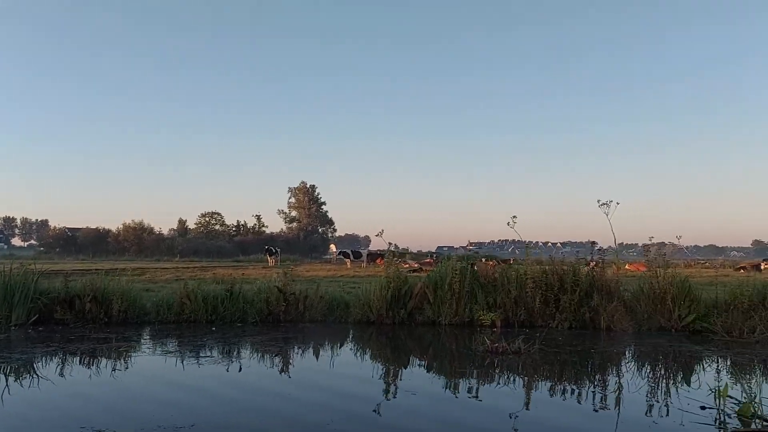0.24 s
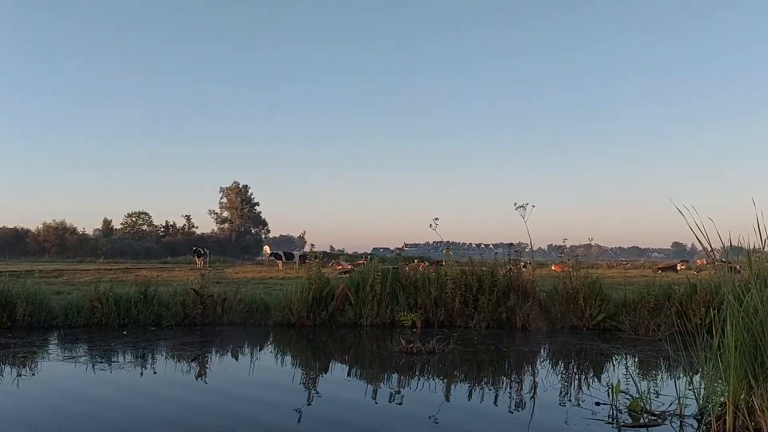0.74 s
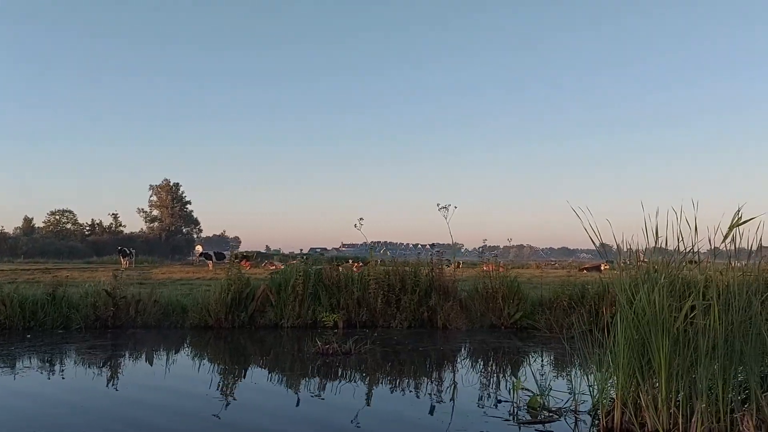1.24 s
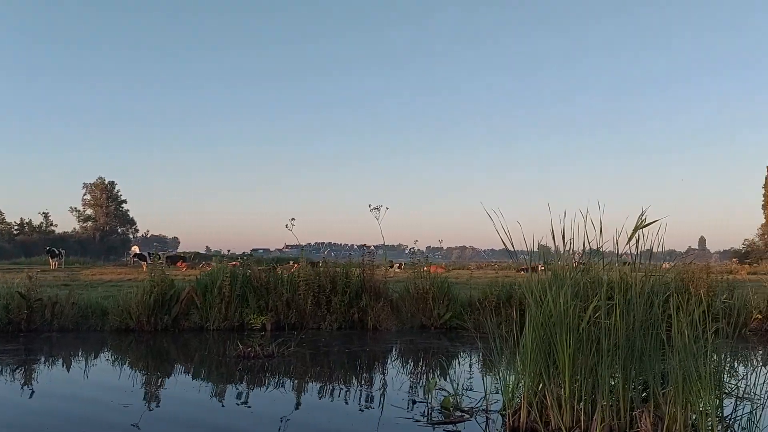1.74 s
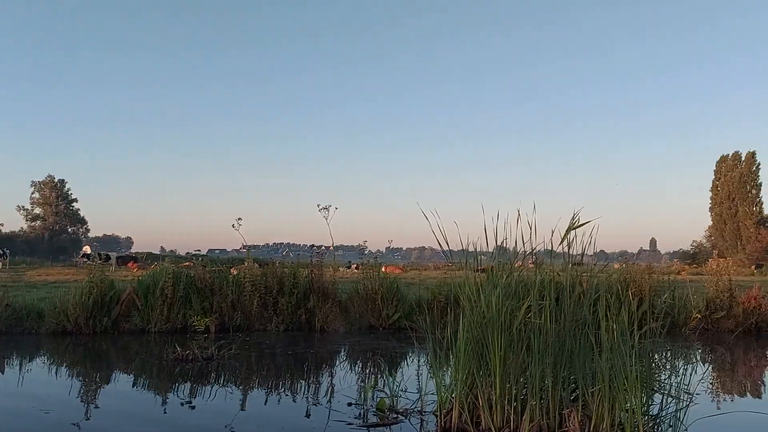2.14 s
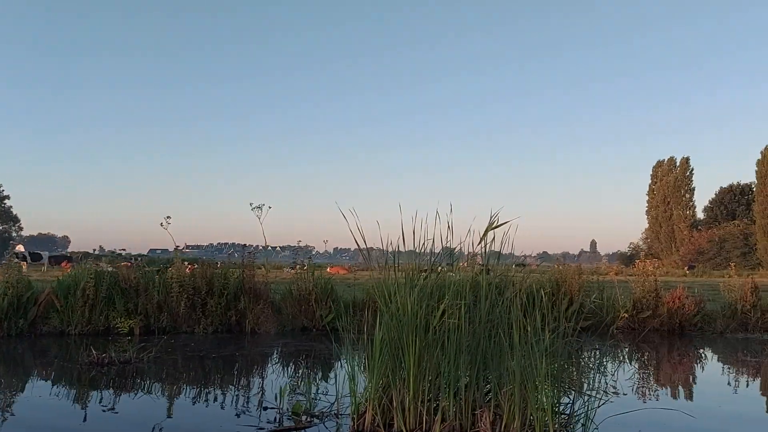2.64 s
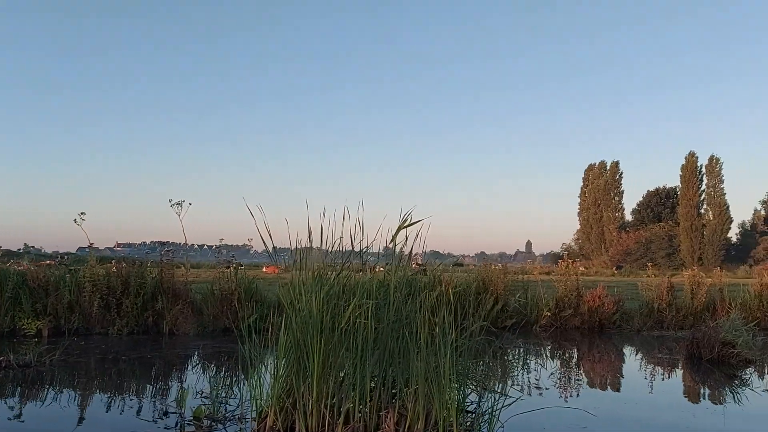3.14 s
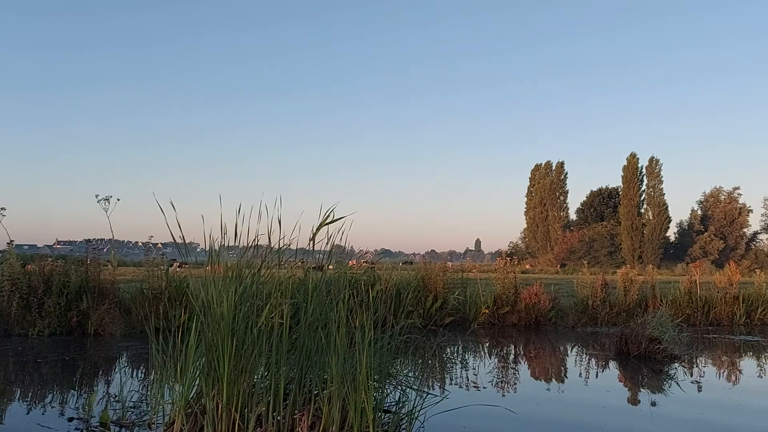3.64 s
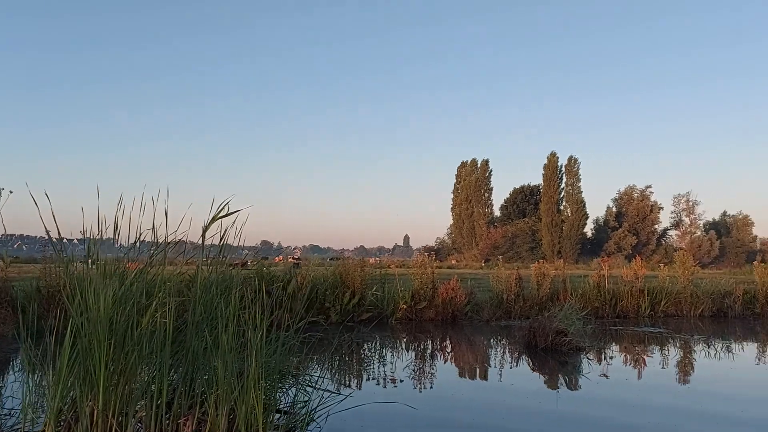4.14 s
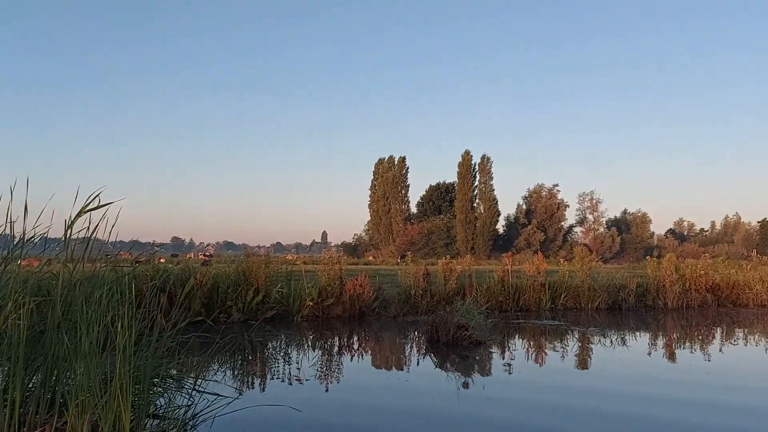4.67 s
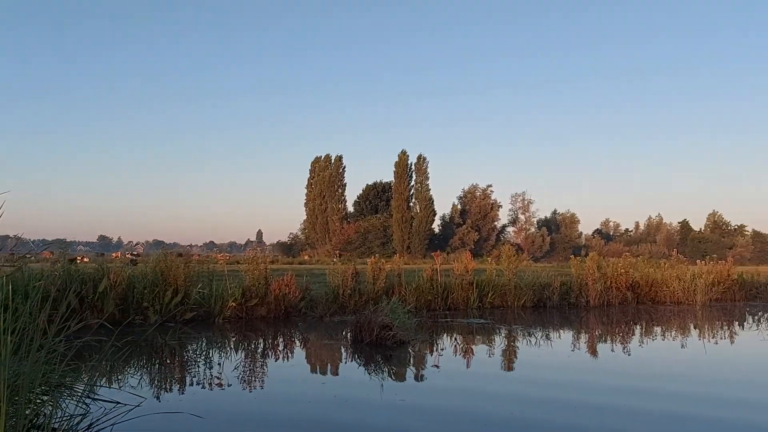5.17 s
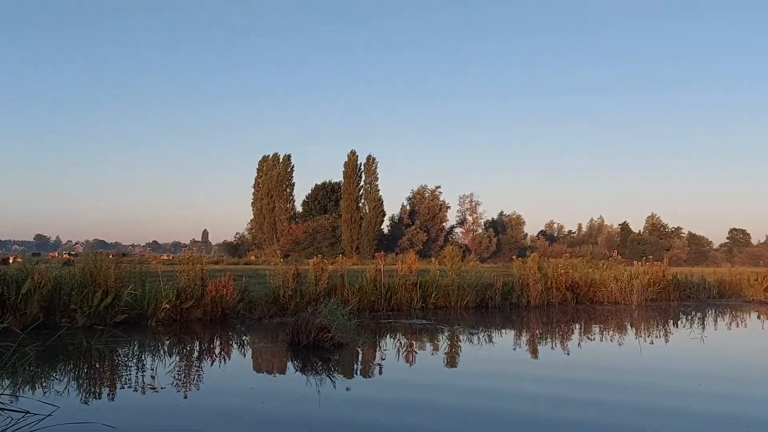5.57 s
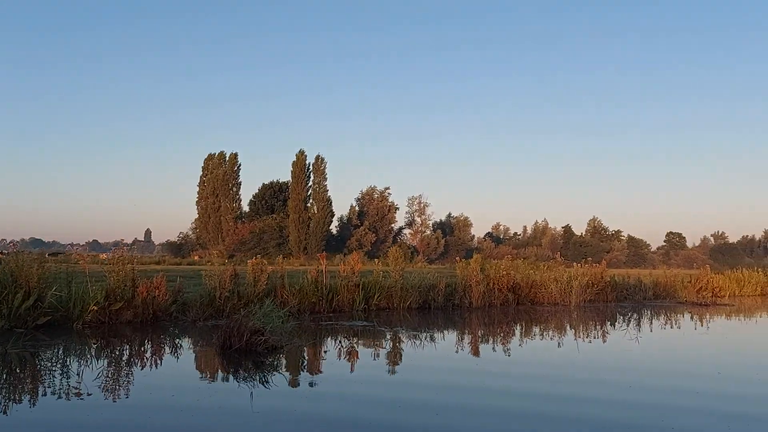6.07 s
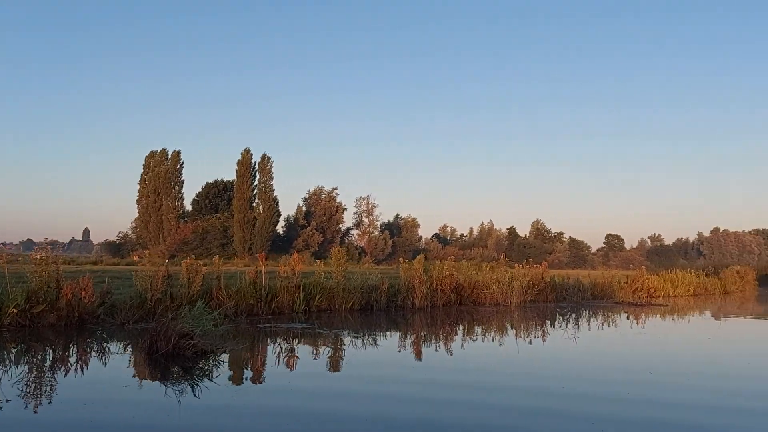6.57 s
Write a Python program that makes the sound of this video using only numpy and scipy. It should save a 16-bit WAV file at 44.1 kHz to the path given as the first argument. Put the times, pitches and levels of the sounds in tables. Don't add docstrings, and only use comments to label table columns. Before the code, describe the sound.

A small boat engine idles close by on a still pond throughout: low buzzing hum, irregular metallic ticks, thin hiss and little water drips. Halfway through, a cow on the grassy bank gives one rising, strained moo of about a second. A water bird rasps faintly as it ends. The motor dips slightly, then a deeper cow starts a call, cut off at the end. Open outdoor stereo, the right side duller.

```python
import sys
import numpy as np
from scipy import signal
from scipy.fft import rfft, irfft, next_fast_len
from scipy.io import wavfile
from scipy.ndimage import uniform_filter1d

SR = 44100
rng = np.random.default_rng(int(sys.argv[2]) if len(sys.argv) > 2 else 0)


def rack_gain(trim_db):
    fader = np.asarray(trim_db, float)
    return 10 ** (fader / 20)


def unload_audio(sound):
    columns = np.transpose(np.atleast_2d(sound))
    steps = np.round(np.clip(columns, -1, 1) * 32767)
    wavfile.write(sys.argv[1], SR, steps.astype(np.int16))


N = 300321
TIME = np.arange(N) / SR
HZ = np.fft.rfftfreq(next_fast_len(N), 1 / SR) + 1e-3

FIRING_HZ = 30.05
# time in seconds, lead on a steady idle in firings.
HUNTING_S_FIRINGS = [(0, .035), (.3, .09), (.45, .167), (.95, .135), (1.1, .09), (1.4, -.095), (1.55, -.09),
                     (2.4, .095), (2.55, .05), (3.15, .025), (3.5, -.165), (3.95, -.29), (4.25, -.27),
                     (4.95, .3), (5.25, .29), (5.55, .395), (6.3, .365), (6.81, .09)]
# time in seconds, level in dB.
SWING_S_DB = [(0, 0.5), (.9, .5), (1.6, 0.5), (2.3, -.5), (3.3, 0), (4.4, 1), (4.6, -2.5), (5.2, -5.5),
              (5.8, -3.5), (6.05, -0.5), (6.81, 1.5)]
STRONG_ORDERS = [(3, 0.01), (4, -0.02), (5, -0.31)]
# multiple of the firing rate, start in cycles, rms in dB.
WEAK_ORDERS = [(2, -0.16, -50.5), (4.5, -0.49, -52), (6, -0.038, -47), (8, -0.19, -48), (11, 0.06, -49.5),
               (14, -0.39, -58.5)]
ORDER_DB, ORDER_SWING, ORDER_SAG = [-36, -30.5, -38], [0.25, 1.73, 0.38], [0.13, 2.7, 0.33]
FIFTH_FADE_DB_PER_S, SEVENTH_DB = -1.12, -44.5
# time in seconds, depth in dB.
SAGS_S_DB = [
    (0, -9),
    (.45, -1),
    (1.33, -1.5),
    (2.4, -4.5),
    (2.85, -1.5),
    (3.75, -3.5),
    (4.35, -2.5),
    (5.1, -4),
]
# time in seconds, height in dB.
BURBLE_S_DB = [
    (0.1, 3),
    (1.05, 2.5),
    (1.75, 0),
    (3.0, 2.5),
    (4.1, -3),
]
SAG_S, BURBLE_S = 0.076, 0.15
# time in seconds, rms in dB, half length in seconds.
SEVENTH_SWELLS = [(0.343, -36, 0.042), (0.546, -35, 0.043), (2.075, -37, 0.017), (1.003, -33.5, 0.17),
                  (1.91, -39.5, 0.23), (2.486, -36.5, 0.025), (2.754, -36.5, 0.064), (3.9, -48, 0.35),
                  (5.235, -42, 0.13), (6.108, -38, 0.097), (6.6, -44.5, 0.66)]
# frequency in Hz, density in dB per Hz.
RUMBLE_HZ_DB = [(20, -45), (40, -15.5), (70, -11.5), (110, -0.5), (200, -7), (330, -8.5), (430, -11),
                (520, -20), (800, -25), (1200, -47)]
CLATTER_HZ_DB = [(500, -5), (800, 2.5), (1000, 2.5), (1200, 0.5), (1400, 2.5), (1750, -1), (2000, -4.5),
                 (2400, -2.5), (3000, -13), (3500, -8), (4200, -13.5), (6000, -21.5)]
HISS_HZ_DB = [(3000, -22), (4200, -12), (5200, -4), (6300, 2), (6900, -3), (7900, 7.5), (8600, 1.5),
              (9100, 5), (9700, -6), (11000, 3), (12000, 6.5), (13000, 3), (13500, 2), (14000, -13),
              (15800, -2.5)]
# share of the turn, gain in dB.
BREATHING_DB = [(0, 5.5), (.1, -1), (.27, -1.5), (.45, 1), (.68, 4), (.85, 2), (1, 5.5)]
# share of the turn, gain in dB.
COVER_SWELL_DB = [(0, -19), (.1, 10), (.2, 1.5), (.3, 6), (.45, 4.5), (.6, 3.5), (.72, -1.5), (.9, -6),
                  (1, -11)]
COVER_HZ, COVER_WIDTH_HZ = 691.5, 19
LAYER_DB, LAYER_SWING = [-36, -51, -62.5, -51], [0.63, 1, 0.14, 0.36]
CLATTER_RISE_DB_PER_S = 0.2064
# time in seconds, crack peak in dB, knock above that in dB.
TICKS = [(0.122, -37, -23), (0.3317, -49, 8.5), (0.3865, -44, -26), (0.493, -44, 2), (0.5243, -24, -7),
         (0.6256, -31, -6.5), (0.7256, -34.5, -4.5), (0.9183, -37, -15), (1.129, -36.5, -6),
         (1.266, -28, -10.5), (1.49, -34, -10), (1.597, -45.5, 8), (1.698, -44, -2), (1.7294, -35, 3.5),
         (1.861, -33, -3.5), (1.931, -24.5, -13), (2.0643, -45, 8.5), (2.195, -39, -4.5), (2.2952, -47, 4),
         (2.4604, -44, 2), (2.613, -33, -16), (2.727, -36.5, -3), (3.039, -41, -11), (3.1262, -44, 5),
         (3.263, -34, -7), (3.8046, -30, -6), (4.0705, -47, -5), (4.2042, -44, -2), (4.3334, -35, -8),
         (4.461, -32, -9.5), (5.249, -36.5, -6.5), (5.444, -43, -1), (5.6764, -35, -3),
         (5.7114, -26.5, -15), (5.1706, -41, -13), (6.2233, -42, -14), (6.313, -33, -9), (6.449, -36, -10)]
# time in seconds, peak in dB.
TICK_TOPS_S_DB = [(0.12, -44.5), (0.188, -47), (0.3865, -43.5), (0.4449, -47), (0.5246, -34.5),
                  (0.626, -43), (0.684, -47), (0.9173, -50), (1.2032, -49), (1.265, -44), (1.4531, -44),
                  (1.4875, -46), (1.512, -42.5), (1.5978, -48), (1.729, -42), (1.7928, -50), (1.8173, -49),
                  (1.861, -43), (1.9303, -42.5), (1.9879, -52), (2.3144, -46), (2.4615, -47),
                  (2.7277, -46.5), (2.7995, -46.5), (3.0465, -50), (3.0789, -49), (3.2131, -48),
                  (3.262, -46), (3.631, -45), (4.2604, -49), (4.3326, -47), (4.4622, -50), (4.8489, -49),
                  (5.0677, -47.5), (5.1677, -50), (5.247, -45), (5.444, -46), (5.6745, -45), (5.7113, -39),
                  (5.9, -49), (5.9663, -51), (6.0417, -47), (6.2317, -48), (6.3107, -45)]
# time in seconds, peak in dB.
PINGS_S_DB = [(0.4933, -54), (0.5242, -47), (0.627, -53), (0.6833, -59), (0.9602, -59), (1.266, -54),
              (1.3324, -58), (1.4995, -54), (1.5344, -56), (1.73, -48), (1.8617, -53), (1.931, -52),
              (2.0617, -46), (2.1924, -59), (2.4618, -53), (3.263, -52), (3.3653, -59), (3.5029, -54),
              (3.6002, -57), (3.8048, -53), (4.0711, -52), (4.2048, -58), (4.3331, -58), (4.4628, -57),
              (4.4927, -61), (4.7521, -58), (4.8494, -59), (5.2131, -61), (5.7114, -49), (5.8436, -58)]
PING_HZ, PING_T60_S, TOP_RING_HZ, TOP_RING_T60_S = 14900, .02, 11980, .04
# frequency in Hz, width in Hz, level in dB.
BLOCK_MODES = [(1450, 300, 4.5), (1720, 290, 1.5), (2400, 380, 3), (3340, 530, -7)]
# time in seconds, peak in dB, pitch in Hz, t60 in seconds.
DRIPS = [(0.123, -37, 900, .03), (.387, -43, 4550, 0.018), (.5255, -42, 3460, 0.017),
         (.545, -51, 1800, 0.018), (.561, -41, 1530, 0.023), (0.684, -40, 2320, .015),
         (.779, -43, 3620, 0.014), (.991, -37, 3180, 0.028), (1.095, -41.5, 3680, .02),
         (1.369, -39.5, 3760, 0.02), (1.499, -39.5, 1450, 0.069), (2.965, -34, 3860, 0.019),
         (3.04, -37.5, 4700, 0.012), (3.096, -27, 1450, 0.024), (3.224, -39.5, 4100, 0.018),
         (2.936, -45, 4100, .015), (2.975, -47, 2400, 0.016), (4.789, -36, 960, 0.033),
         (4.852, -47, 2450, .02), (5.172, -37, 3900, 0.012), (5.479, -45, 2500, 0.025),
         (5.38, -45, 2480, .02), (5.409, -48, 2240, .02), (5.445, -50, 2000, .02), (5.58, -45, 2350, .02),
         (5.808, -44, 2480, .02), (5.891, -54, 2260, .02), (4.963, -55, 2480, .02), (6.02, -51, 2510, .02),
         (5.503, -34.5, 1090, 0.067), (6.042, -45, 2450, 0.031)]
SPECKS = [(0.0662, -40, 3430, 0.012), (0.2947, -43, 3530, 0.012), (0.8964, -46, 3100, 0.012),
          (0.9244, -51, 3840, 0.012), (1.0495, -52, 3470, 0.012), (1.1623, -46, 3970, 0.012),
          (1.2885, -44, 3760, 0.012), (1.3174, -44, 3520, 0.017), (1.534, -39, 3840, 0.01),
          (1.5648, -45, 3890, 0.012), (1.9624, -45, 3980, 0.012), (2.0894, -49, 3120, 0.012),
          (2.2842, -39, 3440, 0.012), (2.5227, -50, 3440, 0.012), (2.8928, -46, 3570, 0.012),
          (3.1587, -52, 3810, 0.012), (4.204, -43, 4020, 0.012), (4.3329, -43, 4250, 0.012)]
DRIP_SHORTEN, SPLASH_DB, SPLASH_S = .65, -8, .0015

# time in seconds, pitch in Hz, level in dB, throat shape as an index,
# roughness from 0 to 1, limp from 0 to 1.
HIGH_COW = [(3.338, 150.8, -33.5, 0.42, 0.53, 0), (3.41, 158.8, -28.5, 0.35, 0.22, 0),
            (3.51, 168.3, -27.5, 0.1, 0.19, 0.04), (3.56, 193.5, -27, 0.66, 0.9, 0.4),
            (3.645, 225.9, -22, 1.7, 0.5, 0.9), (3.715, 239.3, -19, 1.15, 0.25, 1),
            (3.785, 245, -20.5, 1.14, 0.14, 1), (3.805, 248.5, -20.5, 2.13, 0.2, .3),
            (3.87, 254.9, -20.5, 2.3, 0, .15), (3.9, 258.9, -21, 2.63, 0.02, 0),
            (3.98, 264.5, -20.5, 3.02, 0, 0), (4.1, 270.3, -22.5, 2.94, 0.06, 0.2),
            (4.26, 282.1, -21.5, 3.83, 0, 0), (4.37, 273, -22.5, 4.4, 0.1, 0.05),
            (4.405, 231, -21, 4, 0.26, 0.1), (4.44, 151, -29, 3.9, 0.6, 0.4)]
LOW_COW = [
    (6.195, 85, -31, 0.13, .2, 0),
    (6.24, 88.35, -27.5, 0.18, 0.13, 0.13),
    (6.35, 94.76, -28, 0.61, .12, 0.07),
    (6.438, 99.4, -21.5, 0.92, .05, 0),
    (6.48, 101.8, -22.5, 1.3, 0.087, 0),
    (6.55, 106.8, -21, 1.22, 0.055, 0),
    (6.612, 110.1, -21, 1.42, .04, 0.089),
    (6.7, 112.8, -21.5, 1.7, 0.037, 0.0092),
    (6.84, 116.1, -22, 1.74, 0.033, 0.09),
]
# frequency in Hz, level in dB.
HIGH_CLOSED = [(100, -55), (160, 0.5), (330, -2), (490, 0), (650, -12), (980, -4), (1145, -1.5),
               (1310, -39), (1470, -22), (1800, -38), (2050, -15.5), (2400, -31), (3200, -41), (4200, -58)]
HIGH_BREAKING = [(140, -3), (240, 0), (480, -12), (710, -28), (950, -33), (1100, -31), (1300, -25),
                 (1570, -30), (1800, -44), (2060, -22), (2300, -29), (2800, -46), (3100, -38), (3400, -38),
                 (4200, -65)]
HIGH_STRAINED = [(140, -3), (250, -2.5), (490, -12), (740, -26), (990, -26), (1240, -16), (1490, -33),
                 (1730, -56), (1980, -28), (2230, -24.5), (2480, -30), (2900, -36), (3300, -46),
                 (4200, -67)]
HIGH_OPEN = [(140, 3), (265, 1.5), (530, -11), (800, -15.5), (1070, -15.5), (1330, -30.5), (1600, -55),
             (1860, -48), (2120, -24), (2400, -44), (2650, -29), (2900, -46), (3300, -67), (4200, -69)]
HIGH_TIRING = [(140, -18), (280, 2.5), (460, -6.5), (560, -15.5), (840, -11.5), (1120, -25), (1400, -49),
               (1680, -47), (1960, -64), (2250, -35), (2530, -21), (2800, -29), (3100, -57), (4200, -77)]
# frequency in Hz, level in dB.
LOW_CLOSED = [(90, -15), (180, 2), (270, -5.5), (360, -12.5), (500, -2.5), (680, -26), (900, -6),
              (1080, -12), (1260, -20), (1450, -13), (1650, -15), (1930, -23), (2120, -44), (2500, -32),
              (3000, -47), (3300, -28), (4000, -37), (4430, -28), (5200, -60)]
LOW_HALF = [(100, -11), (206, -1.5), (309, 5), (412, -18), (515, 4.5), (720, -19), (930, -1), (1130, -9.5),
            (1250, -27), (1440, -13), (1750, -18), (2060, -40), (2270, -22), (2700, -25.5), (3150, -26),
            (3350, -43), (3600, -38), (4430, -32), (5200, -71)]
LOW_OPEN = [(100, -42), (228, 1.5), (400, -3.5), (570, -2.5), (720, -7.5), (1000, 2.5), (1140, -7.5),
            (1370, -8), (1500, -25), (1750, -25), (2000, -13), (2150, -17), (2330, -12.5), (2700, -19),
            (2870, -28), (3080, -21), (3350, -40), (3650, -27), (4100, -28), (4800, -23), (5200, -62)]
# frequency in Hz, density in dB per Hz.
OPEN_AIR_HZ_DB = [(600, -26), (1500, -4), (4000, -11), (5000, -18), (7500, -10), (9000, -29)]
# frequency in Hz, width in Hz, level in dB.
NOSE = [(3300, 1100, -20), (5630, 500, -19)]
ATTACK_S, RELEASE_S, LIMP_TURN_RAD = .008, .022, 1.25
WATER_ECHO_S, WATER_ECHO_DB = .0045, -15

# start in seconds, length in seconds, rms in dB, frequency in Hz, width in Hz.
FAR_CALLS = [
    (4.372, 0.055, -47, 1180, 90),
    (4.385, .05, -52, 2200, 300),
    (4.55, .07, -52, 1030, 120),
    (4.54, .06, -45, 1430, 200),
    (4.585, .07, -46, 1480, 300),
    (4.3, 0.85, -54.5, 1470, 380),
    (5.7, 0.55, -56, 1350, 500),
    (4.95, 0.24, -51.5, 1320, 330),
    (4.5, 1.9, -58, 1020, 200),
]

# frequency in Hz, gain in dB.
RIGHT_MOTOR_HZ_DB = [(60, -.9), (200, -2.2), (700, -2), (1300, -4), (1800, 1), (2400, -1), (3200, -2),
                     (3600, -7), (4200, -9), (5000, -16), (7500, -26), (11300, -20), (12000, -25),
                     (15000, -21)]
RIGHT_HIGH_COW_HZ_DB = [(100, 1.5), (300, -4), (800, -3), (1080, -9), (1400, 0), (2100, -3), (3000, -6),
                        (5000, -8), (8000, -27)]
RIGHT_LOW_COW_HZ_DB = [(100, -1), (300, -1.5), (600, -3), (860, -8.5), (1080, -3.5), (1400, 2), (2150, 1.5),
                       (2800, -1), (4300, -8), (5600, -41), (8000, -23)]
# frequency in Hz, right port lead in cycles.
LOW_COW_TURN = [(600, 0), (850, .03), (1100, .12), (2000, .15), (2300, -.05), (4500, -.05)]
# frequency in Hz, share common to both ports.
LIKENESS = [(60, 0.79), (200, 0.94), (450, 1), (900, 0.68), (3500, 0.15), (5000, 0.36), (10000, 0.033)]
LAG_SAMPLES, LAG_SAMPLES_PER_S = 23.33, -0.96


def motor():
    firings = FIRING_HZ * TIME + in_time(HUNTING_S_FIRINGS)[0]
    swing_db, sag_db = in_time(SWING_S_DB)[0], bumps(SAGS_S_DB, SAG_S)
    order_dbs = [db + swing * swing_db + sag * sag_db
                 for db, swing, sag in zip(ORDER_DB, ORDER_SWING, ORDER_SAG)]
    order_dbs[2] += FIFTH_FADE_DB_PER_S * TIME
    layer_dbs = [db + swing * swing_db for db, swing in zip(LAYER_DB, LAYER_SWING)]
    rumble_db, clatter_db, hiss_db, cover_db = layer_dbs
    clatter_db += CLATTER_RISE_DB_PER_S * TIME
    breath = cyclic(BREATHING_DB, firings)

    rumble_db = rumble_db + .6 * bumps(BURBLE_S_DB, BURBLE_S) + 1.6 * drift(12)
    noise = rack_gain(rumble_db) * noise_pair(RUMBLE_HZ_DB)
    noise += rack_gain(clatter_db + 1.1 * drift(30)) * breath * noise_pair(CLATTER_HZ_DB)
    noise += rack_gain(hiss_db + 3.0 + 0.61 * drift(8.3)) * breath * shadowed_hiss()

    solid = exhaust_hum(firings, order_dbs)
    solid += rack_gain(cover_db) * cyclic(COVER_SWELL_DB, firings / 2) * cover_ring()
    solid += ticks(firings) + drips()
    solid += rack_gain(clatter_db - 12.5) * splatter()
    lag = LAG_SAMPLES + LAG_SAMPLES_PER_S * TIME
    return ports(*(noise + solid), RIGHT_MOTOR_HZ_DB, lag)


def exhaust_hum(firings, order_dbs):
    hum = np.zeros(N)
    for (k, start), db in zip(STRONG_ORDERS, order_dbs):
        cycles = k * firings + start + 0.013 * drift(17)
        hum += rack_gain(db + 0.66 * drift(12)) * np.cos(2 * np.pi * cycles)
    burble_db = bumps(BURBLE_S_DB, BURBLE_S)
    for k, start, db in WEAK_ORDERS:
        cycles = k * firings + start + 0.043 * drift(5)
        hum += rack_gain(db - 2 + burble_db + 4.5 * drift(9)) * np.cos(2 * np.pi * cycles)
    s, db, half_s = np.transpose(SEVENTH_SWELLS)
    seventh = rack_gain(SEVENTH_DB) + bumps(list(zip(s, rack_gain(db))), half_s)
    cycles = 7 * firings + .05 * drift(6)
    hum += rack_gain(-3.5 + 3 * drift(11)) * seventh * np.cos(2 * np.pi * cycles)
    return np.sqrt(2) * hum


def cover_ring():
    ring = resonance(rng.standard_normal(N), COVER_HZ, COVER_WIDTH_HZ)
    ring = rms_one(resonance(ring, COVER_HZ, 3 * COVER_WIDTH_HZ))
    return rms_one(ring / uniform_filter1d(ring ** 2, size=2600) ** .3)


def shadowed_hiss():
    hiss = noise_pair(HISS_HZ_DB)
    turned = np.clip((TIME - 4.46) / 0.018, 0, 1)
    return hiss - .65 * turned * (resonance(hiss, 6100, 2200) + resonance(hiss, 9900, 1300))


def ticks(firings):
    each = np.flatnonzero(np.diff(np.floor(firings + 0.016)))
    faint_db = -52 + 4.5 * rng.standard_normal((len(each), 4)) + 4.3 * rng.standard_normal((len(each), 1))
    hits = np.zeros((4, N))
    hits[:, each] = rack_gain(faint_db + [-18.0, 0.5, -12.0, -20.0]).T
    for s, db, knock_db in TICKS:
        hits[[0, 2], round(s * SR)] = rack_gain([db, db + knock_db + 3.5])
    for s, db in TICK_TOPS_S_DB:
        hits[1, round(s * SR)] = rack_gain(db + 11.0)
    for s, db in PINGS_S_DB:
        hits[3, round(s * SR)] = rack_gain(db + 8.0)
    out = struck(hits[3], PING_HZ, PING_T60_S)
    out += rack_gain(-22) * struck(hits[1], TOP_RING_HZ, TOP_RING_T60_S)
    bands_hz = (2420, 4700), (5660, 14600), (1090, 2600)
    for hit, decay_s, band_hz in zip(hits, (0.0017, 0.0032, 0.0041), bands_hz):
        band = signal.butter(2, band_hz, "band", fs=SR, output="sos")
        out += 0.28 * decaying(hit, decay_s) * rms_one(signal.sosfilt(band, rng.standard_normal(N)))
    knock = decaying(hits[2], 0.0085) * rng.standard_normal(N)
    block = sum(rack_gain(db) * resonance(knock, hz, width_hz) for hz, width_hz, db in BLOCK_MODES)
    return out + rack_gain(0.5) * block


def drips():
    out = np.zeros(N)
    t = np.arange(2048) / SR
    for s, db, hz, t60_s in DRIPS + SPECKS:
        drop = np.sin(2 * np.pi * hz * (t + 6 * t ** 2))
        drop *= rack_gain(-60 * t / (DRIP_SHORTEN * t60_s)) * np.minimum(t / 0.00052, 1)
        splash = rms_one(resonance(rng.standard_normal(t.size), 0.53 * hz, 0.44 * hz))
        drop += rack_gain(SPLASH_DB) * np.exp(-t / SPLASH_S) * splash
        out[round(s * SR):][:len(t)] += rack_gain(db + 4.5) * drop
    return out


def splatter():
    sizes = rack_gain(4 * np.minimum(rng.exponential(1, N), 3)) * (rng.random(N) < 160 / SR)
    dealt = rng.integers(0, 12, N)
    pitches_hz = np.geomspace(1300, 3300, num=12)
    return rms_one(sum(resonance(sizes * (dealt == k), hz, hz / 9) for k, hz in enumerate(pitches_hz)))


def cow(call, shapes, count, jitter, breath_db, rasp_db, smear, nose_db, scatter_db, mouth_db,
        shimmer_db, first):
    start, end = round(call[0][0] * SR), min(round(call[-1][0] * SR), N)
    size = end - start
    pitch, level_db, opening, rough, limp = [c[start:end] for c in in_time(call)]
    opening, rough = np.clip(opening, 0, len(shapes) - 1), np.clip(rough, 0, 1)
    shares = [np.clip(1 - np.abs(opening - j), 0, 1) for j in range(len(shapes))]
    phases = [ringing_phase(shape) for shape in shapes]
    cycles = first + np.cumsum(pitch) / SR + jitter * rough * drift(110, size)
    turn = LIMP_TURN_RAD * np.clip(limp, 0, 1) * (1 + .15 * drift(14, size))
    slack = np.clip(-np.gradient(uniform_filter1d(pitch, size=400)) * SR / 250, 0, 1)
    spread = smear * rng.standard_normal(2 * count)

    voice, power = 0, 0
    for k in np.arange(1, count, .5):
        handed = turn * np.clip(.17 * k - .15, 0, 1)
        throat_db = sum(share * at_hz(shape, k * pitch) for share, shape in zip(shares, shapes))
        gain = rack_gain(throat_db - 14 * slack * (k > 2)) * (np.sin(handed) if k % 1 else np.cos(handed))
        shimmer = rack_gain(min(.3 * k, shimmer_db) * drift(12, size))
        ring = sum(share * np.interp(k * pitch, *phase) for share, phase in zip(shares, phases))
        phase_rad = 2 * np.pi * (k * cycles - spread[int(2 * k)]) + ring
        voice = voice + gain * shimmer * np.cos(phase_rad)
        power = power + gain ** 2 / 2

    throat_gain = rack_gain(at_hz(shapes[0], HZ)) * (HZ > 600)
    air = rms_one(colour(rng.standard_normal(N), throat_gain))[start:end]
    mouth_air = rms_one(colour(rng.standard_normal(N), rack_gain(at_hz(OPEN_AIR_HZ_DB, HZ))))[start:end]
    air += opening * rack_gain(mouth_db) * mouth_air
    air *= (rough * rack_gain(breath_db) + rack_gain(rasp_db)) * (1 + np.cos(2 * np.pi * cycles))
    for hz, width_hz, db in NOSE:
        air += rough * rack_gain(db + nose_db) * rms_one(resonance(rng.standard_normal(size), hz, width_hz))

    edges = np.minimum((TIME - call[0][0]) / ATTACK_S, (call[-1][0] - TIME) / RELEASE_S)
    out = np.zeros(N)
    out[start:end] = np.clip(edges, 0, 1)[start:end] * rack_gain(level_db) * (voice / np.sqrt(power) + air)
    out += rack_gain(WATER_ECHO_DB) * colour(out, np.exp(-2j * np.pi * HZ * WATER_ECHO_S) * (HZ > 1300))
    tail_t = np.arange(round(.3 * SR)) / SR
    tail = rng.standard_normal(tail_t.size) * rack_gain(-200 * tail_t)
    return out + rack_gain(scatter_db) * signal.fftconvolve(out, tail / np.linalg.norm(tail))[:N]


def far_calls():
    out = np.zeros(N)
    for s, length_s, db, hz, width_hz in FAR_CALLS:
        swell = np.sin(np.pi * np.clip((TIME - s) / length_s, 0, 1)) ** 2
        rasp = resonance(rng.standard_normal(N), hz, width_hz)
        out += rack_gain(db) * swell * rms_one(resonance(rasp, hz, width_hz))
    return ports(out, out, RIGHT_HIGH_COW_HZ_DB, 35.5)


def ports(left, right, right_colour, lag_samples, turn=((20, 0), (20000, 0))):
    gain = rack_gain(at_hz(right_colour, HZ)) * np.exp(2j * np.pi * at_hz(turn, HZ))
    late = np.interp(np.arange(N) - lag_samples, np.arange(N), colour(right, gain))
    return np.array([left, late])


def noise_pair(spectrum):
    common, own = rng.standard_normal((2, N))
    alike, gain = np.clip(at_hz(LIKENESS, HZ), 0, 1), rack_gain(at_hz(spectrum, HZ))
    left = colour(common, gain)
    right = colour(common, gain * alike) + colour(own, gain * np.sqrt(1 - alike ** 2))
    return np.array([left, right]) / np.std(left)


def ringing_phase(points):
    grid_hz = np.abs(np.fft.fftfreq(4096, 1 / SR)) + 1
    phase = -signal.hilbert(np.log(rack_gain(at_hz(points, grid_hz)))).imag
    return grid_hz[:2048], phase[:2048]


def resonance(x, hz, width_hz):
    r = np.exp(-np.pi * width_hz / SR)
    poles = [1, -2 * r * np.cos(2 * np.pi * hz / SR), r * r]
    return signal.lfilter(np.array([1, 0, -1]) * (1 - r * r) / 2, poles, x + 1e-18)


def struck(hits, hz, t60_s):
    r, w = rack_gain(-60 / (t60_s * SR)), 2 * np.pi * hz / SR
    return signal.lfilter([0, np.sin(w)], [1, -2 * r * np.cos(w), r * r], hits + 1e-18)


def decaying(hits, decay_s):
    return signal.lfilter([1], [1, -np.exp(-1 / (decay_s * SR))], hits + 1e-18)


def drift(rate_hz, size=N):
    place = np.arange(size) * rate_hz / SR
    knots, left = rng.standard_normal(int(place[-1]) + 2), place.astype(int)
    part = place - left
    return rms_one(knots[left] + (knots[left + 1] - knots[left]) * (3 - 2 * part) * part ** 2)


def bumps(rows, half_s):
    halves_s = np.broadcast_to(half_s, len(rows))
    return sum(height * np.exp(-((TIME - s) / half) ** 2) for (s, height), half in zip(rows, halves_s))


def cyclic(pattern, turns):
    return rack_gain(np.interp(turns % 1, *np.transpose(pattern)))


def in_time(rows):
    s, *columns = np.transpose(rows)
    return [np.interp(TIME, s, c) for c in columns]


def at_hz(points, hz):
    table_hz, values = np.transpose(points)
    return np.interp(np.log(hz), np.log(table_hz), values)


def colour(x, gain):
    size = next_fast_len(N)
    return irfft(rfft(x, size) * gain, size)[..., :N]


def rms_one(x):
    return x / np.sqrt(np.mean(x ** 2) + 1e-20)


def scene():
    high_shapes = [HIGH_CLOSED, HIGH_BREAKING, HIGH_STRAINED, HIGH_OPEN, HIGH_TIRING]
    high = cow(HIGH_COW, high_shapes, count=22, jitter=.09, breath_db=-20, rasp_db=-35, smear=.08,
               nose_db=-12, scatter_db=-20, mouth_db=-30, shimmer_db=1.6, first=0)
    low = -cow(LOW_COW, [LOW_CLOSED, LOW_HALF, LOW_OPEN], count=56, jitter=.04, breath_db=-14,
               rasp_db=-32, smear=.045, nose_db=-30, scatter_db=-22, mouth_db=-8, shimmer_db=3.2, first=.47)
    cows = ports(high, high, RIGHT_HIGH_COW_HZ_DB, 24.8)
    cows += ports(low, low, RIGHT_LOW_COW_HZ_DB, 18, LOW_COW_TURN)
    return motor() + cows + far_calls()


def band_limit(x):
    return signal.sosfilt(signal.butter(12, 15830, fs=SR, output="sos"), x)


def record(dry):
    top_cut = signal.cheby2(12, 60, 16800, fs=SR, output="sos")
    self_noise = rack_gain(-94) * rng.standard_normal(dry.shape)
    return band_limit(signal.sosfilt(top_cut, dry + self_noise))


dry = scene()
out = record(dry)
unload_audio(out)
```